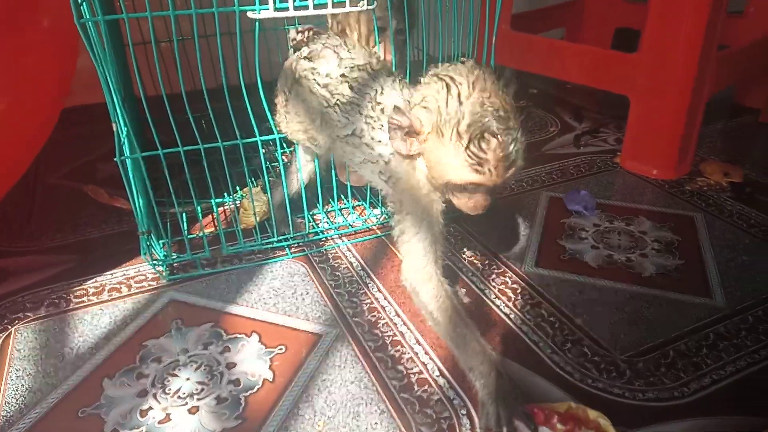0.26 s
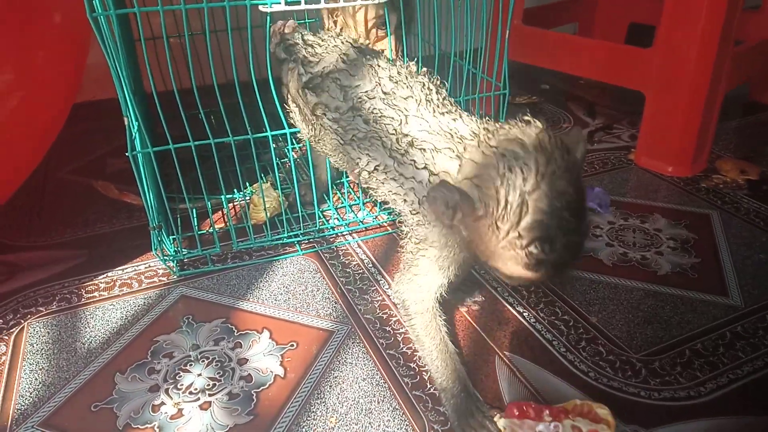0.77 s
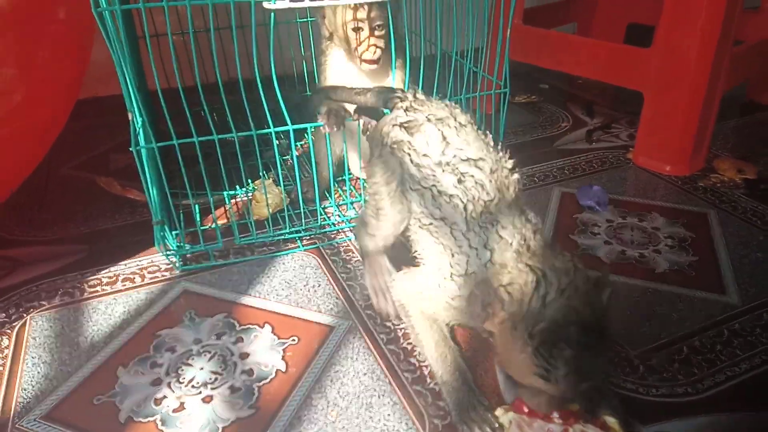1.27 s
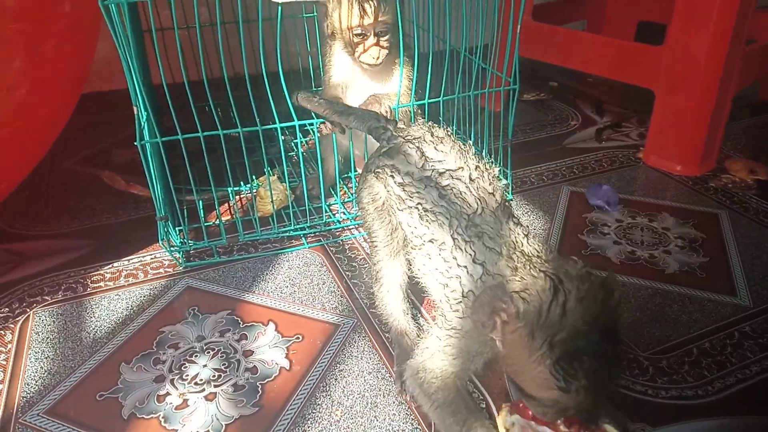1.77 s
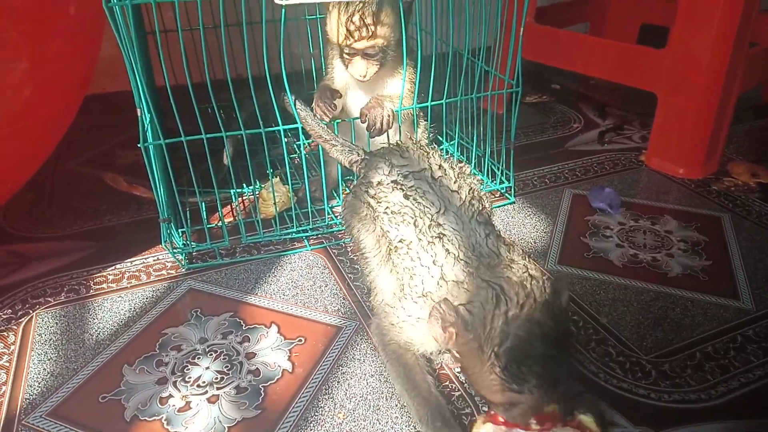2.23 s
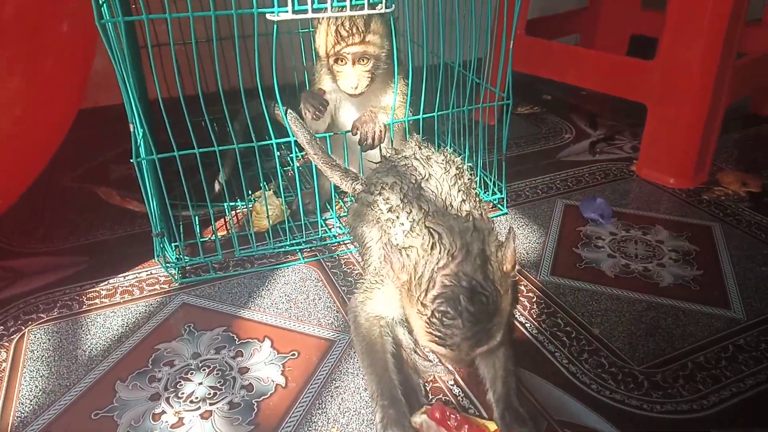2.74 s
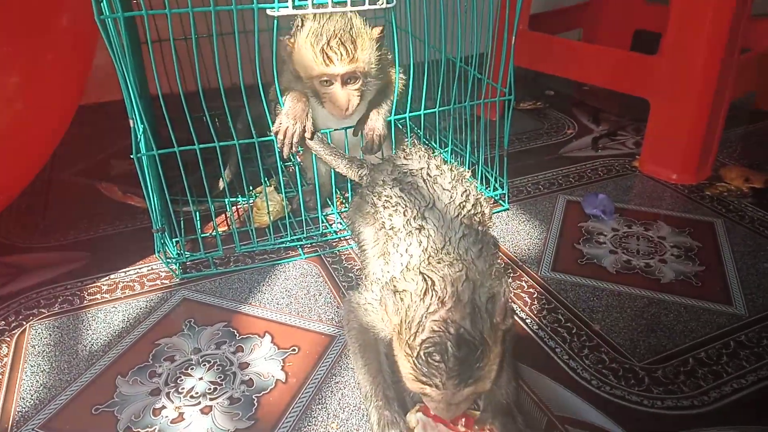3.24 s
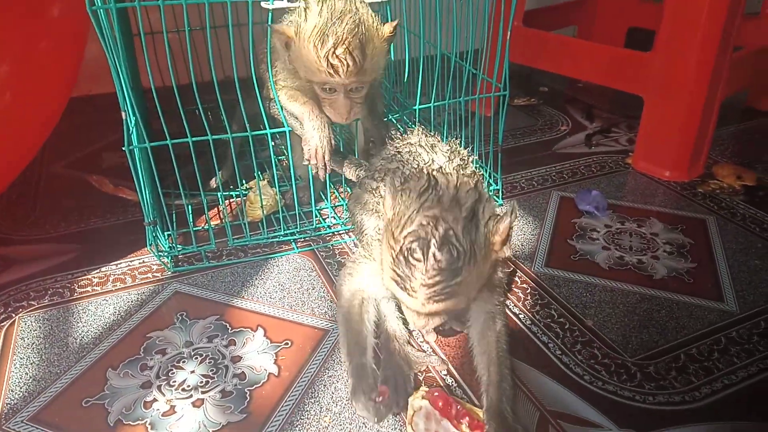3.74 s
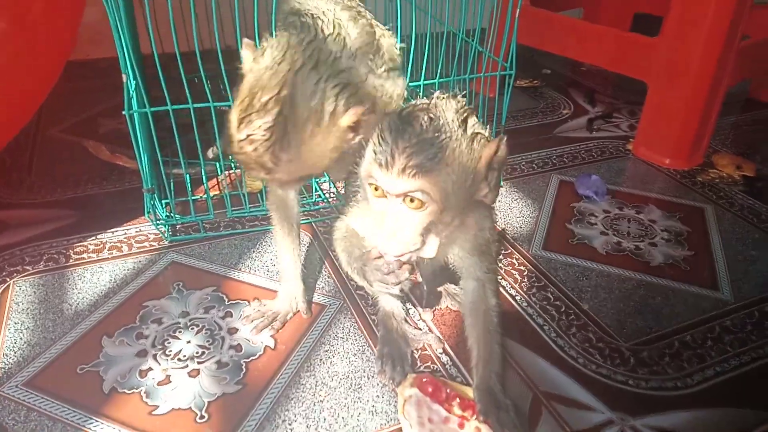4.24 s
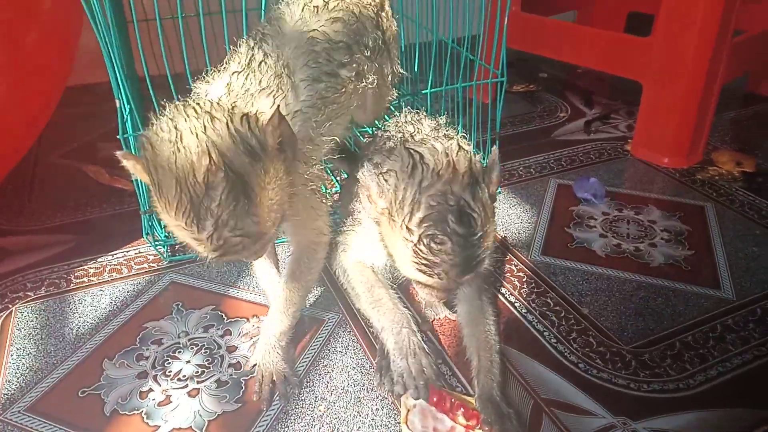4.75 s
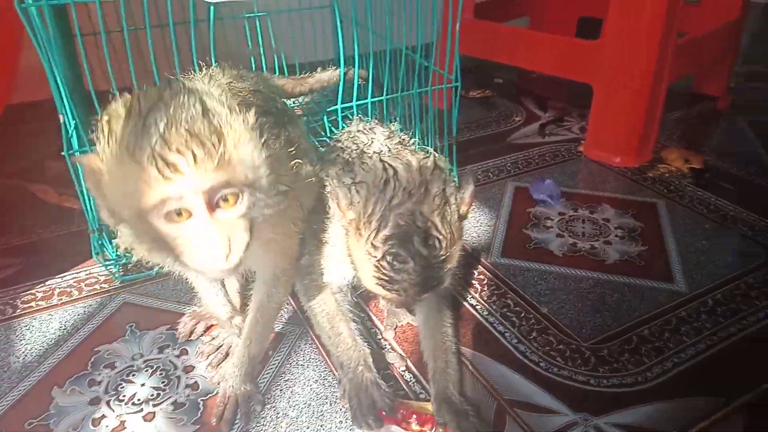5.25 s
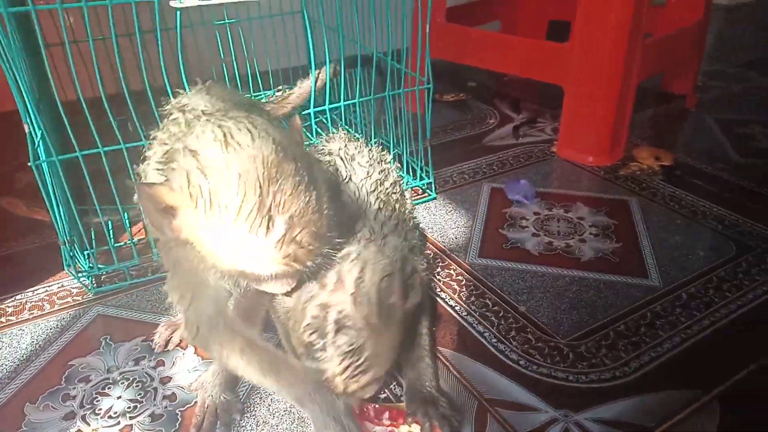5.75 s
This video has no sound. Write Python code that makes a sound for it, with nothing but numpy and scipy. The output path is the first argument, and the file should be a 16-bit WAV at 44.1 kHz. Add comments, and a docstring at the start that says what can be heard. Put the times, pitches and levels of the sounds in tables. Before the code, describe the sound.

A young monkey coos once, then lets out a rising screech that cracks at its piercing peak, the loudest sound here. It coos twice more before a faint far squeak and a pair of quiet, hoarse grunts. Light, scattered touches on a wire cage and floor mat run throughout. Everything reaches one microphone in a small bare-walled room with a short ring and low steady hush.

```python
"""Young monkeys in a small, live room

One microphone in a room with a hard floor and bare walls. A monkey gives a clear coo, then a cry that
climbs until its vocal folds flip into a shrill whistle and break downward, then two more coos. A thin
squeak comes from farther off, and two soft grunts follow. Hands and feet tick lightly on the mat and
the wire cage, over a steady, dull room tone."""
import sys
import numpy as np
from scipy import signal
from scipy.fft import rfft, irfft, next_fast_len
from scipy.io import wavfile
from scipy.ndimage import uniform_filter1d, minimum_filter1d, map_coordinates

SR = 44100
rng = np.random.default_rng(int(sys.argv[2]) if len(sys.argv) > 2 else 0)


def output_pcm(signal):
    """Save a mono or channel-first signal as 16-bit PCM at the path in sys.argv[1].

    Samples are clipped to [-1, 1] before scaling.
    """
    pcm = np.clip(np.atleast_2d(signal).T, -1, 1) * 32767
    wavfile.write(sys.argv[1], SR, np.round(pcm).astype(np.int16))


N = 265041

# Throat and mouth with the lips pursed. Each row: frequency in Hz, gain in dB.
PURSED_MOUTH = [(450, -6), (900, 0.5), (1800, -3), (2700, 2.5), (3600, -13.5), (4500, -12), (5400, -19.5),
                (6100, -25), (8400, -22), (9900, -32.5), (11200, -26), (15000, -40.5)]
# The coos. Each row: start and length in seconds, first pitch, last pitch and arch in Hz, scoop time in
# seconds, waver rate in Hz, level, overtone level and overtone growth in dB, overtone fall in dB per
# octave, formant in Hz, formant gain in dB.
COOS = [(-.02, .166, 849.5, 729.3, -5.5, 0.0088, 8.1, -35.5, 9.5, -3, 14.5, 4050, 7.5),
        (2.415, 0.2555, 831.6, 871.5, 28, 0.016, 12.3, -34.5, 1, 4.5, 9.5, 4370, 7.5),
        (3.424, .281, 888.6, 934.7, -10.5, .008, 10, -29.5, -10, 11, 7, 3520, 11)]


def coos(scoop_per_s=10, drop_s=.0049, attack_s=.015, first_crest_s=.036, fade_db=7):
    """Clear contact calls: each scoops up to a wavering glide, fades and drops off pitch at the end."""
    out = np.zeros(N)
    for (start, length, first_hz, last_hz, arch_hz, scoop_s, waver_hz,
         db, overtone_db, growth_db, slope_db, formant_hz, formant_db) in COOS:
        span, age, progress = timeline(start, length)
        scoop = scoop_per_s * scoop_s * np.exp(-age / scoop_s)
        drop = .06 * np.exp((age - length) / drop_s)
        waver = .009 * np.cos(2 * np.pi * waver_hz * (age - first_crest_s))
        pitch = arc(progress, first_hz, last_hz, arch_hz) * (1 - scoop - drop + waver)
        gain = amp(db - fade_db * progress ** 2) * envelope(age, attack_s, release_s=.013)
        onset_db = 6 * np.exp(-age / attack_s)  # the folds snap shut at the onset
        bright_db = overtone_db + growth_db * progress ** 2 + onset_db
        out += vocal_folds(span, pitch, gain, bright_db, PURSED_MOUTH, slope_db, jitter=.0027,
                           rasp=.014, air_db=-39.5, formant_hz=formant_hz, formant_db=formant_db)
    return out


# Throat and mouth stretched wide for the cry. Each row: frequency in Hz, gain in dB.
OPEN_MOUTH = [(900, 0), (1800, 0.5), (2700, -1.5), (3300, -4.5), (4500, -3), (5400, -31.5), (7000, -11.5),
              (8700, -19.5), (10200, -39.5), (11400, -25), (12700, -38), (14300, -21.5)]
# The climb that opens the cry. Each row: time in seconds, pitch in Hz, level in dB.
CRY_CLIMB = [(1.085, 860, -24.5), (1.105, 913.5, -28.5), (1.125, 924, -25.5), (1.147, 960, -29.5),
             (1.17, 1038, -29), (1.199, 1293, -26), (1.216, 1561, -24), (1.232, 1743, -25.5),
             (1.239, 2370, -25), (1.254, 2530, -28.5)]


def cry_climb(strain_db=12.5, flip_hz=2030, flip_db=21):
    """A coo tightens and rises; overtones grow with strain, then vanish as it flips to a whistle."""
    start, end = CRY_CLIMB[0][0], CRY_CLIMB[-1][0]
    span, age, progress = timeline(start, end - start)
    pitch, db = curves(CRY_CLIMB, span / SR)
    flipped = 1 / (1 + (flip_hz / pitch) ** 20)
    overtone_db = -7 + strain_db * progress - flip_db * flipped
    gain = amp(db) * envelope(age, attack_s=.018, release_s=.005)
    return vocal_folds(span, pitch, gain, overtone_db, OPEN_MOUTH, slope_db=9,
                       jitter=.008 * progress, rasp=.05 * progress, air_db=-38)


# The whistle at the top of the cry. Each row: start and length in seconds, pitch and sag in Hz,
# opening level, swell and overtone level in dB.
WHISTLE_SQUEEZES = [(1.264, .042, 2668, 39.9, -20, -1.5, -25), (1.311, 0.021, 2904, 170, -29, 15.5, -7.5),
                    (1.345, .023, 2943, 105, -19, 3, -4), (1.367, .0135, 3102, 133.5, -17.5, 24, -12.5)]


def cry_whistle():
    """Squeezes of whistle, each higher than the last; each sags in pitch and gets purer as it swells."""
    out = np.zeros(N)
    for start, length, hz, sag_hz, db, swell_db, overtone_db in WHISTLE_SQUEEZES:
        span, age, progress = timeline(start, length)
        pitch = arc(progress, hz, hz - sag_hz)
        risen_db = swell_db * progress
        gain = amp(db + risen_db) * envelope(age, attack_s=.0023, release_s=.0023)
        out += vocal_folds(span, pitch, gain, overtone_db - risen_db / 2, OPEN_MOUTH, slope_db=10,
                           jitter=.0033, rasp=.015, air_db=-47)
    return out


def cry_break(db=-14, fade_db=17.5, crack_db=14.5, crack_s=.0015, dull_db=7):
    """The voice breaks with a bright crack and slides down harshly, duller as the pressure goes."""
    span, age, progress = timeline(start=1.379, length=.038)
    pitch = arc(progress ** .74, first_hz=2717.5, last_hz=1959)
    gain = amp(db - fade_db * progress ** 3) * envelope(age, attack_s=.0009, release_s=.0012)
    overtone_db = -9 + crack_db * np.exp(-age / crack_s) - dull_db * progress ** 3
    return vocal_folds(span, pitch, gain, overtone_db, OPEN_MOUTH, slope_db=3.5,
                       jitter=.009, rasp=.13, air_db=-24.5)


def vocal_folds(span, pitch, gain, overtone_db, mouth, slope_db, jitter, rasp, air_db,
                formant_hz=4000, formant_db=0):
    """Harmonics that fall by slope_db an octave, shaped by the mouth and one movable formant."""
    def tract_db(hz):
        return along(mouth, hz) + formant_db * bump(hz, formant_hz, 530)

    t = span / SR
    # The pitch trembles; under strain the cycles also differ in length and size.
    pitch = pitch * (1 + jitter * wobble(110, t) + .1 * rasp * wobble(1100, t))
    phase = 2 * np.pi * np.cumsum(pitch) / SR
    harmonic = np.arange(1, 19)[:, None]
    harmonic_hz = harmonic * pitch
    # Firmly closing folds give overtones; barely touching folds give a whistle.
    source_db = (harmonic > 1) * overtone_db - slope_db * np.log2(harmonic)
    gains = amp(source_db + tract_db(harmonic_hz) - tract_db(pitch)) * (harmonic_hz < SR / 2)
    tone = np.sqrt(2) * np.sum(gains * np.sin(harmonic * phase), axis=0)
    # Turbulence puffs through the folds once a cycle.
    air = amp(air_db) * noise(tract_db, size=SR // 2)[:len(t)] * (1 + np.sin(phase))
    out = np.zeros(N)
    out[span] = (tone + air) * gain * (1 + rasp * wobble(900, t))
    return out


# Grunts, soft at the microphone. Each row: start and length in seconds, first and last pitch in Hz,
# level and overtone level in dB before the nearly shut mouth muffles them.
GRUNTS = [(4.804, 0.0626, 531, 491.6, -43.5, -0.5), (4.916, 0.05, 532, 591, -39.5, 1.5)]


def grunts(dip_hz=46.4):
    """Two low, slightly hoarse notes with the mouth nearly shut; the pitch dips in the middle of each."""
    muffling = [(1100, 1.0), (1650, -6.5), (2400, -9.5), (5000, -13), (10000, -25)]  # Hz, dB
    out = np.zeros(N)
    for start, length, first_hz, last_hz, db, overtone_db in GRUNTS:
        span, age, progress = timeline(start, length)
        pitch = arc(progress, first_hz, last_hz, -dip_hz)
        gain = amp(db) * envelope(age, attack_s=.0033, release_s=.004)
        out += vocal_folds(span, pitch, gain, overtone_db, PURSED_MOUTH, slope_db=8,
                           jitter=.012, rasp=.11, air_db=-8)
    return filtered(out, lambda hz: amp(along(muffling, hz)))


def far_squeak(start=4.46, length=.3, db=-50.5, swell_db=8.5, pulse_hz=10):
    """A thin note far from the microphone, pulsing as it swells and fades."""
    span, age, progress = timeline(start, length)
    pitch = arc(progress, first_hz=1952.5, last_hz=1921.5)
    pulse_db = 1.5 * np.cos(2 * np.pi * pulse_hz * (age - length / 2))
    taper_db = swell_db * np.abs(2 * progress - 1)
    gain = amp(db + pulse_db - taper_db) * envelope(age, attack_s=.01, release_s=.01)
    return vocal_folds(span, pitch, gain, overtone_db=-14, mouth=PURSED_MOUTH, slope_db=8,
                       jitter=.012, rasp=.02, air_db=-36)


# Light touches on the mat and the wire cage. Each row: start in seconds, level in dB before the trim,
# centre in Hz, width in octaves, seconds to die away by 60 dB.
CAGE_TOUCHES = [(.289, -60, 7000, 0.37, 0.037), (.303, -38, 2720, .16, 0.049), (.98, -59, 7440, 0.29, .03),
                (1.078, -57, 7750, .24, .03), (2.275, -68, 7960, 0.62, .08), (2.889, -67, 8300, .25, .02),
                (3.517, -52, 7600, .21, .015), (3.576, -50.5, 13200, .25, 0.013),
                (3.763, -58.5, 6400, .3, 0.047), (4.002, -35, 2360, .17, 0.027),
                (4.18, -63, 7300, .3, 0.041), (4.989, -37, 2420, .18, 0.034), (5.06, -62, 6300, 0.8, .08),
                (5.364, -61, 6740, .15, .025), (5.831, -64, 7000, .4, .029)]


def cage_ticks(softness=.048, trim_db=-6):
    """Nails and fingers touch down: each a short burst around its own pitch; longer ones start softly."""
    out = np.zeros(N + SR)
    age = np.arange(SR // 6) / SR
    for start, db, centre_hz, octaves, t60 in CAGE_TOUCHES:
        burst = noise(lambda hz: 60 * bump(np.log2(hz + 1), np.log2(centre_hz), 2 * octaves), len(age))
        attack = 1 - np.exp(-(age / (softness * t60)) ** 2)
        decay = amp(db + trim_db - 60 * age / t60)
        out[int(start * SR):][:len(age)] += burst * attack * decay
    return out[:N]


# The dull hush of the room. Each row: frequency in Hz, relative level in dB.
HUSH_SPECTRUM = [(20, -19), (50, -14.5), (90, -4.5), (190, 2), (400, -4.5), (750, 1.5), (1100, 0),
                 (2000, -4.5), (3200, -7.5), (4500, -20.5), (5400, -40), (7300, -37), (9300, -47.5),
                 (15000, -45)]
# Narrow bands of noise lifted slightly in the low hush. Each row: centre in Hz, width in Hz, lift in dB.
HUSH_BANDS = [(56.6, 5.9, 5), (91, 14, 6), (200, 26, 4), (349, 4.1, 9), (467, 11, 7), (655, 17.2, 7.5)]


def room_tone(db=-48, sink_db_per_s=.2669):
    """A hush with a few narrow low bands lifted lies behind the animals and sinks very slowly."""
    def colour_db(hz):
        bands_db = sum(lift * bump(hz, centre, width) for centre, width, lift in HUSH_BANDS)
        return along(HUSH_SPECTRUM, hz) + bands_db

    t = np.arange(N) / SR
    return amp(db - sink_db_per_s * t) * patchy(noise(colour_db), depth_db=2.5)


# The rumble under the hush. Each row: frequency in Hz, relative level in dB.
RUMBLE_SPECTRUM = [(15, -10.5), (35, -4), (55, 13.5), (95, 11.5), (140, -26), (300, -39.5), (1000, -100)]
# Its course at the microphone. Each row: time in seconds, level in dB.
RUMBLE_LEVELS = [(0, -62.5), (.72, -56.5), (.8, -83), (1.1, -58.5), (1.25, -92)]


def rumble():
    """A low rumble dips, returns briefly and dies away just after the first second."""
    db, = curves(RUMBLE_LEVELS, np.arange(N) / SR)
    return amp(db) * noise(lambda hz: along(RUMBLE_SPECTRUM, hz))


# How long the small room rings. Each row: frequency in Hz, seconds to die away by 60 dB.
ROOM_DECAY = [(200, 1), (1000, 0.55), (3000, 0.54), (4300, 0.46), (7000, 0.44), (14000, 0.62)]


def room(x, wet_db, delay_s=.005):
    """Direct sound reaches the microphone first, then the diffuse answer of bare walls."""
    hz, t, spectrum = signal.stft(rng.standard_normal(SR), SR, nperseg=256)
    decay = amp(-60 * t / along(ROOM_DECAY, hz)[:, None])
    tail = signal.istft(spectrum * decay, SR, nperseg=256)[1]
    tail = np.pad(tail / np.linalg.norm(tail), (int(delay_s * SR), 0))
    return x + amp(wet_db) * signal.fftconvolve(x, tail)[:N]


def patchy(x, depth_db):
    """Let neighbouring bands swell and sink on their own."""
    spectrum = signal.stft(x, nperseg=1024)[2]
    swells = uniform_filter1d(rng.standard_normal(spectrum.shape), 5, axis=0)
    swells = unit(uniform_filter1d(swells, 7, axis=1))
    low = 1 / (1 + np.fft.rfftfreq(1024, 1 / SR) / 1500)  # the treble stays smooth
    return signal.istft(spectrum * amp(depth_db * low[:, None] * swells), nperseg=1024)[1][:N]


def timeline(start, length):
    """The samples of one note, their age in seconds and their progress from 0 to 1."""
    span = np.arange(max(0, int(start * SR)), int((start + length) * SR))
    age = np.clip(span / SR - start, 0, length)
    return span, age, age / length


def arc(progress, first_hz, last_hz, arch_hz=0):
    """A pitch glide, bowed upward by arch_hz in the middle."""
    return first_hz + (last_hz - first_hz) * progress + 4 * arch_hz * progress * (1 - progress)


def envelope(age, attack_s, release_s):
    """Attack, hold, release."""
    return np.clip(np.minimum(age / attack_s, (age[-1] - age) / release_s), 0, 1)


def amp(db):
    """Decibels to gain."""
    return 10 ** (np.asarray(db) / 20)


def unit(x):
    """Scale to rms 1."""
    return x / np.sqrt(np.mean(x ** 2) + 1e-20)


def bump(x, centre, width):
    """A bell curve of height 1."""
    return np.exp(-.5 * ((x - centre) / width) ** 2)


def along(points, hz):
    """Read (Hz, value) points on a log axis."""
    knots_hz, values = np.transpose(points)
    return np.interp(np.log(hz + 1), np.log(knots_hz + 1), values)


def curves(rows, t):
    """Each column after the time, read at the times t."""
    times, *columns = np.transpose(rows)
    return [np.interp(t, times, column) for column in columns]


def wobble(rate, t):
    """A smooth random curve with rate knots a second."""
    return map_coordinates(rng.standard_normal(8192), [t * rate], mode="wrap")


def filtered(x, response):
    """Filter x by a gain given as a function of frequency."""
    size = next_fast_len(len(x) + 8192)
    return irfft(rfft(x, size) * response(np.fft.rfftfreq(size, 1 / SR)), size)[:len(x)]


def noise(colour_db, size=N):
    """Noise of rms 1; colour_db gives its relative dB at each frequency."""
    return unit(filtered(rng.standard_normal(size), lambda hz: amp(colour_db(hz))))


def limiter(x, ceiling=.87):
    """A fast look-ahead limiter holds the peaks under full scale."""
    needed = np.minimum(1, ceiling / (np.abs(x) + 1e-9))
    return x * uniform_filter1d(minimum_filter1d(needed, size=265), size=221)


def scene():
    """Voices, touches and room tone as they arrive at the one microphone."""
    calls = room(coos(), wet_db=-3.5)
    cry = room(cry_climb() + cry_whistle() + cry_break(), wet_db=-5.5)
    soft_calls = room(grunts() + far_squeak(), wet_db=-9)
    touches = room(cage_ticks(), wet_db=-7)
    return (calls + cry + soft_calls + touches + room_tone() + rumble())[None]


def record(dry, knee_db=-22, dip_s=.03, dip_share=.72, bass_hz=750, top_hz=15600):
    """The bass dips while the calls are loud; the peaks are limited and the top treble is cut."""
    x = dry[0]
    memory = np.exp(-1 / (dip_s * SR))
    power = signal.lfilter([1 - memory], [1, -memory], x ** 2)
    bass = filtered(x, lambda hz: 1 / (1 + (hz / bass_hz) ** 8))
    dip = dip_share * power / (power + amp(knee_db) ** 2)
    return filtered(limiter(x - dip * bass), lambda hz: hz < top_hz)[None]


dry = scene()
out = record(dry)
output_pcm(out)
```